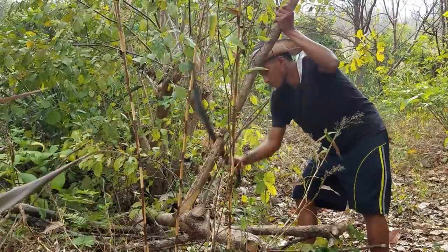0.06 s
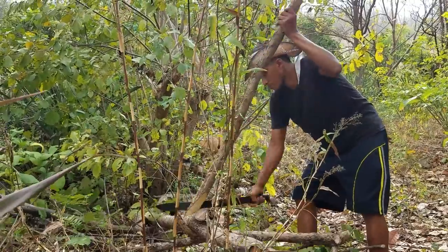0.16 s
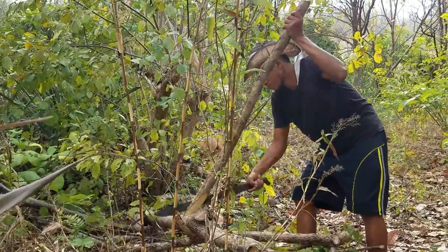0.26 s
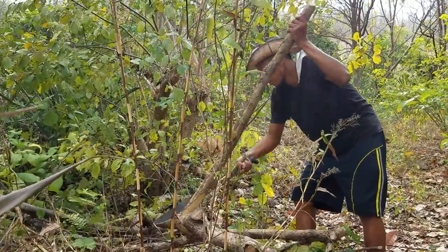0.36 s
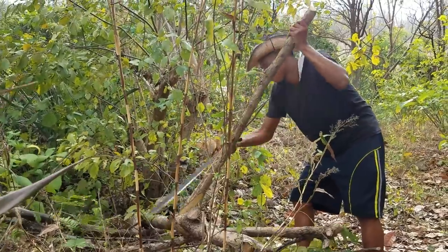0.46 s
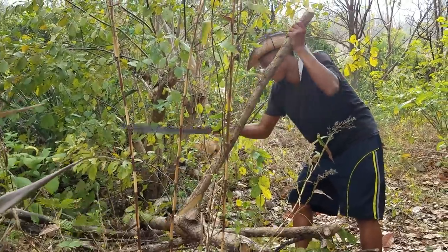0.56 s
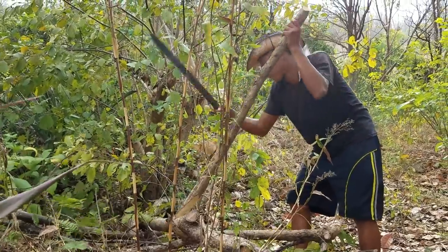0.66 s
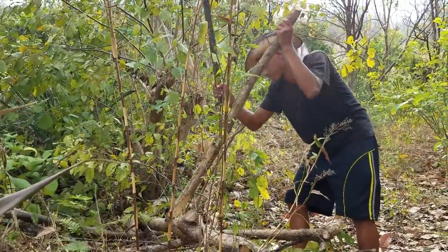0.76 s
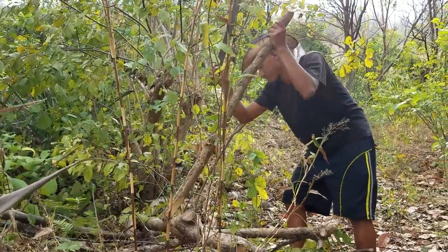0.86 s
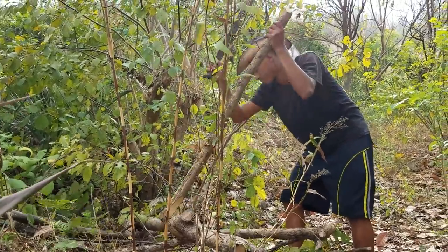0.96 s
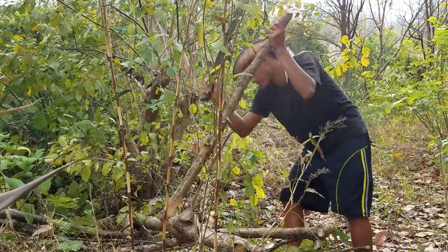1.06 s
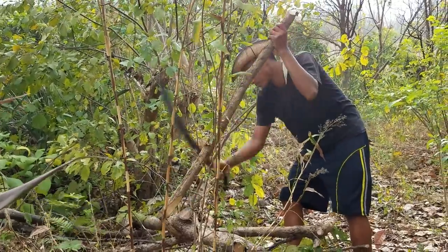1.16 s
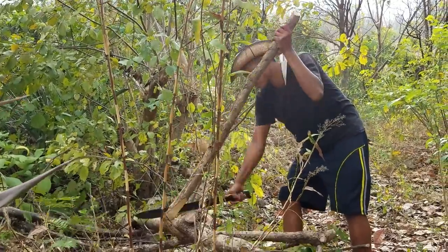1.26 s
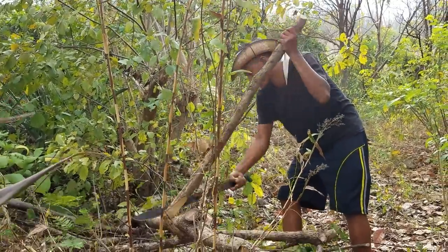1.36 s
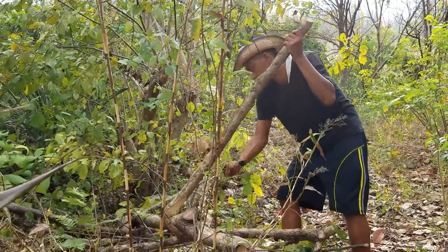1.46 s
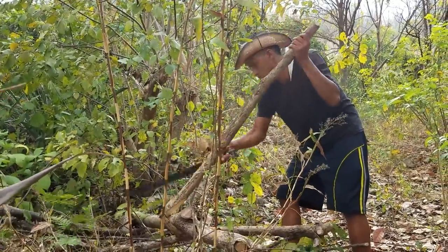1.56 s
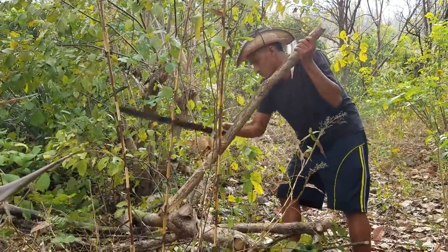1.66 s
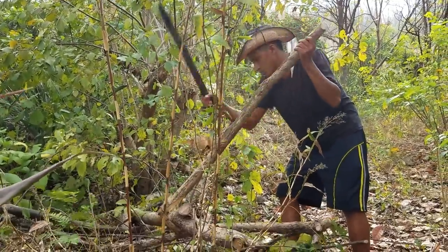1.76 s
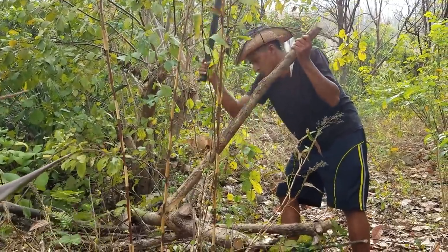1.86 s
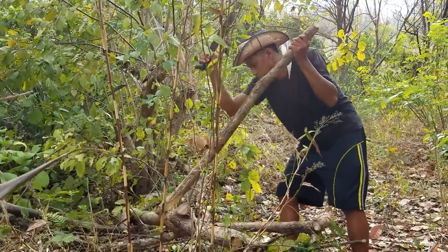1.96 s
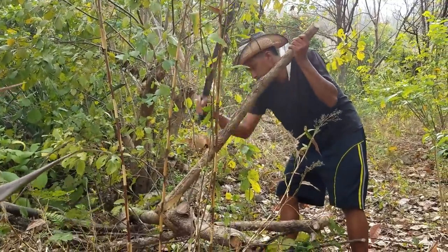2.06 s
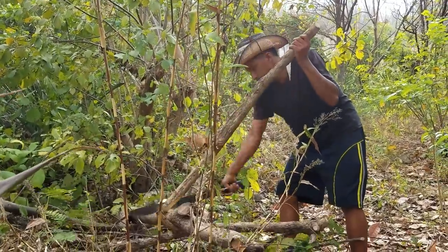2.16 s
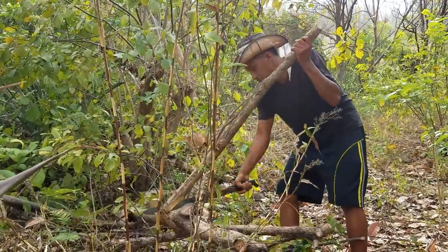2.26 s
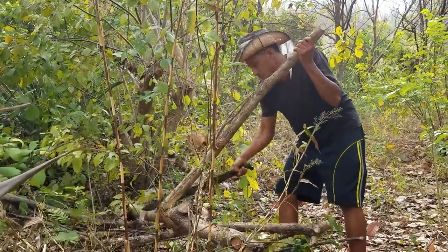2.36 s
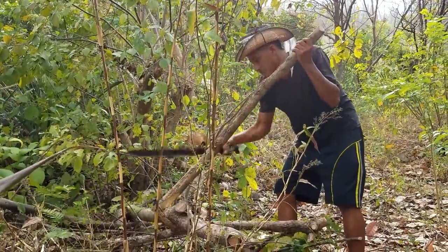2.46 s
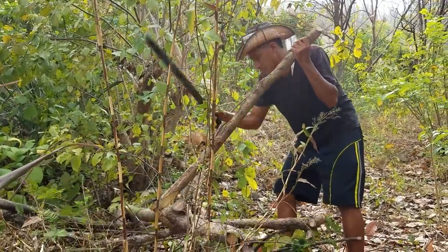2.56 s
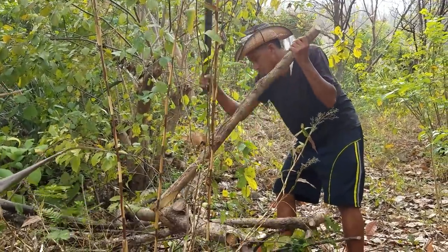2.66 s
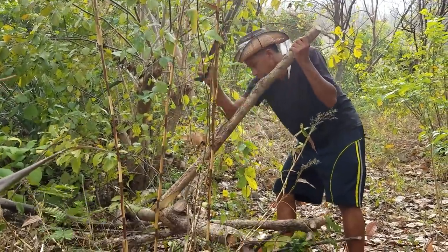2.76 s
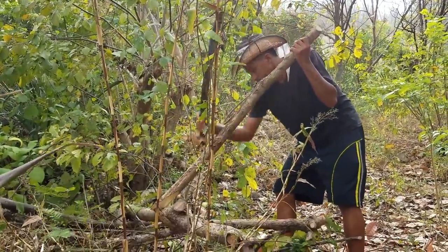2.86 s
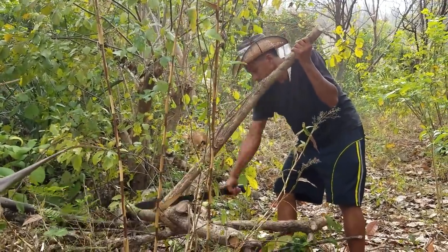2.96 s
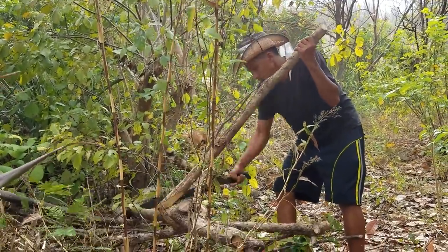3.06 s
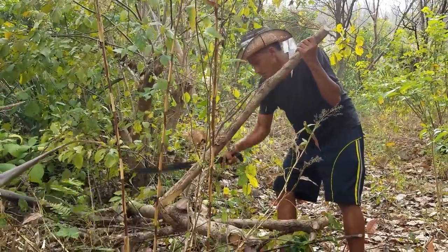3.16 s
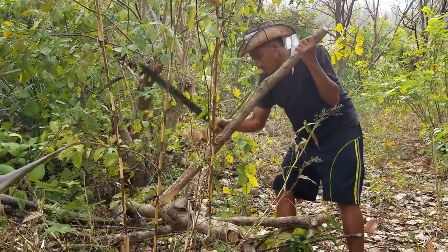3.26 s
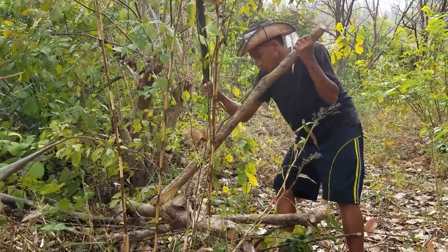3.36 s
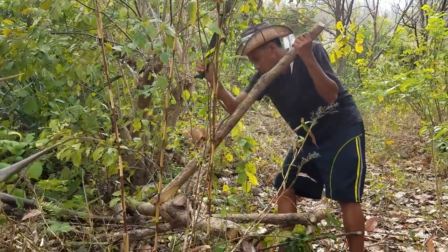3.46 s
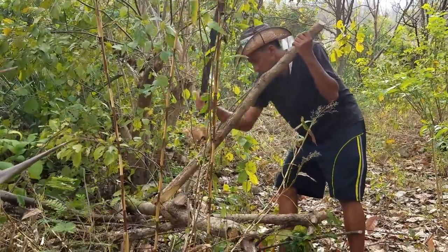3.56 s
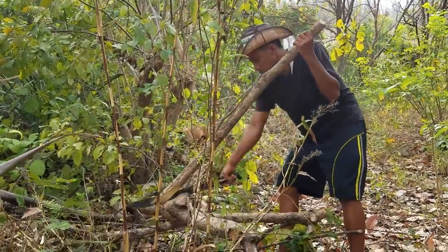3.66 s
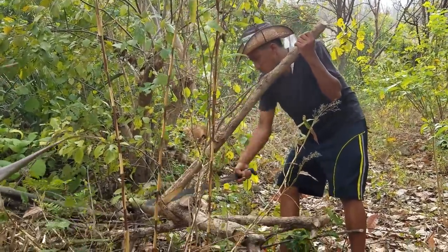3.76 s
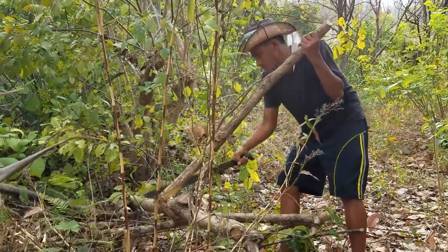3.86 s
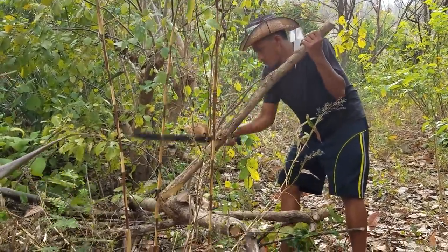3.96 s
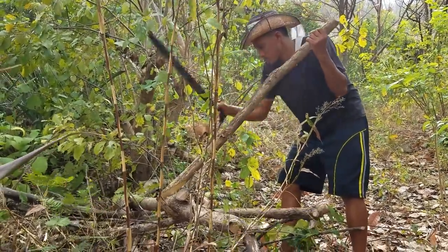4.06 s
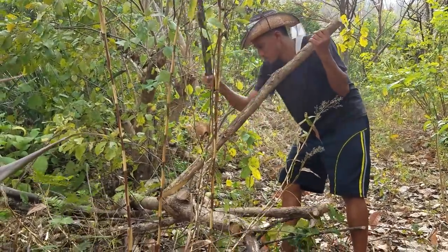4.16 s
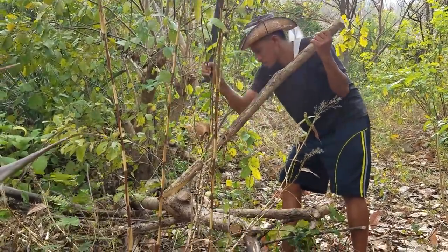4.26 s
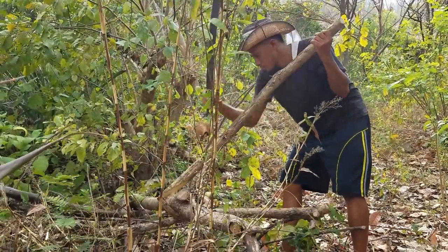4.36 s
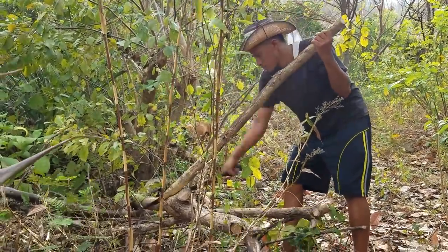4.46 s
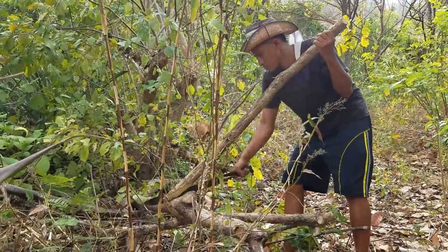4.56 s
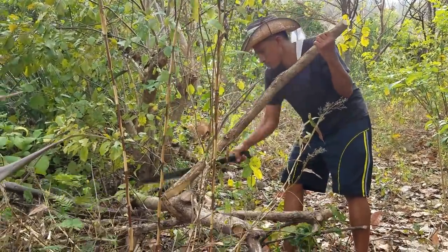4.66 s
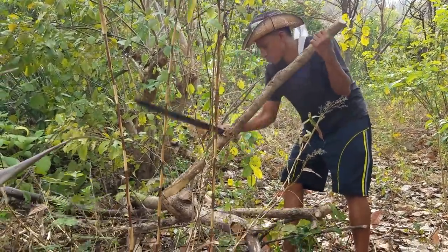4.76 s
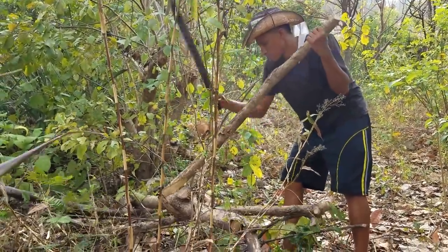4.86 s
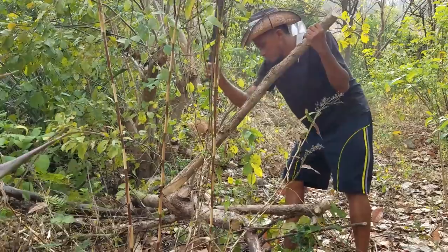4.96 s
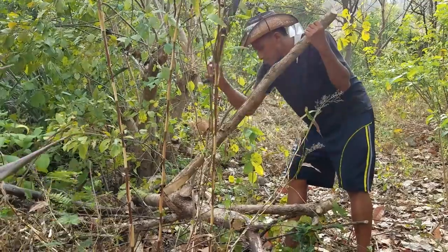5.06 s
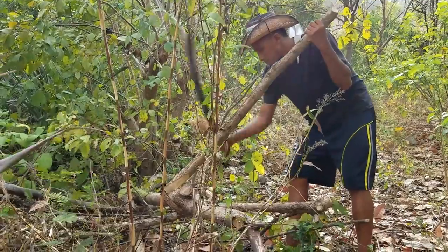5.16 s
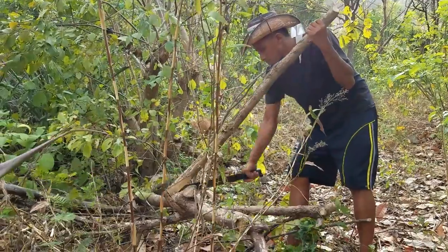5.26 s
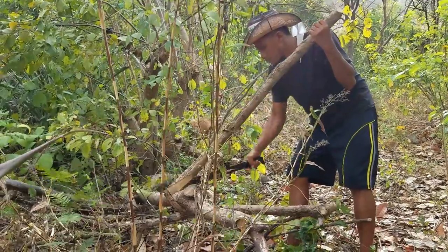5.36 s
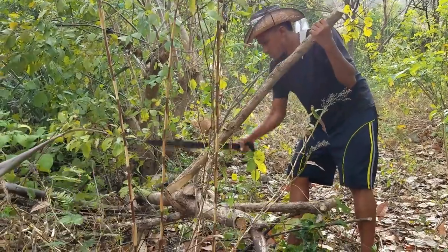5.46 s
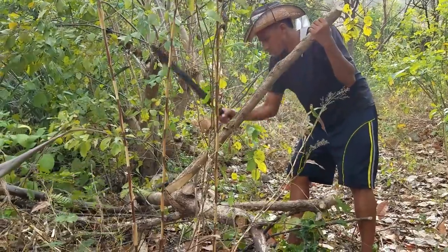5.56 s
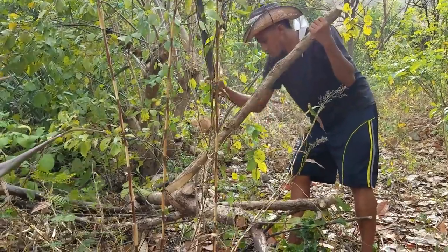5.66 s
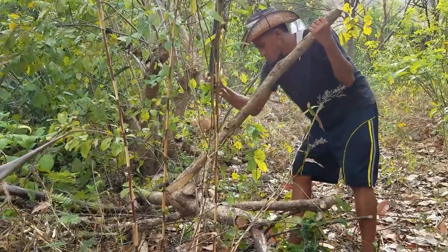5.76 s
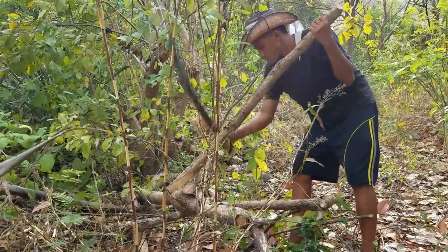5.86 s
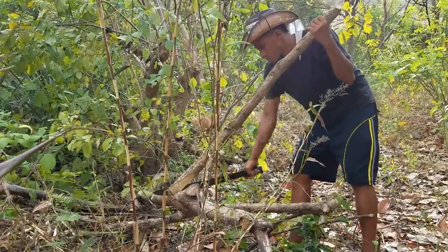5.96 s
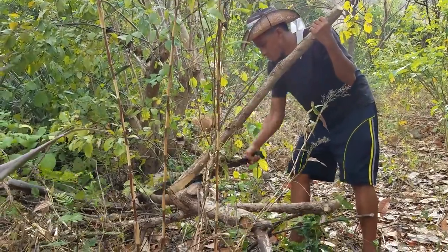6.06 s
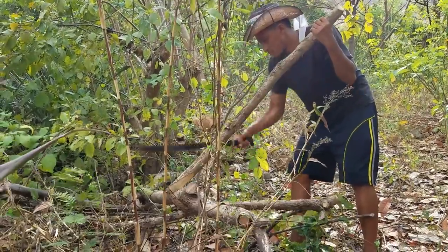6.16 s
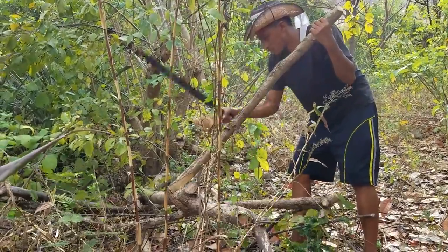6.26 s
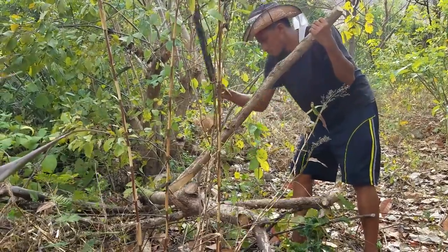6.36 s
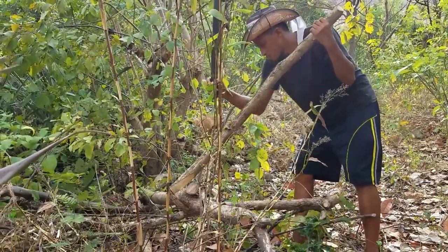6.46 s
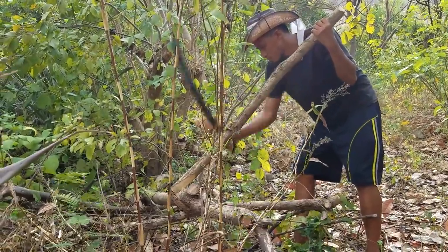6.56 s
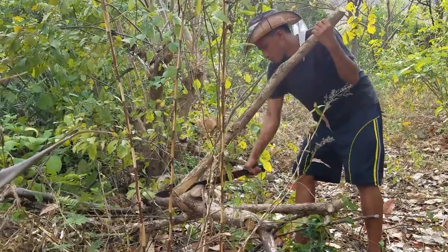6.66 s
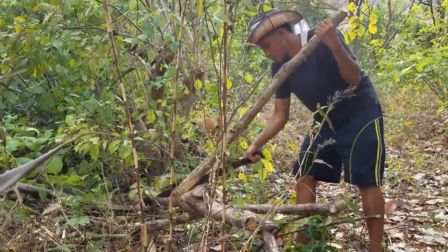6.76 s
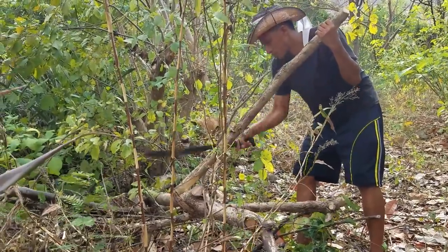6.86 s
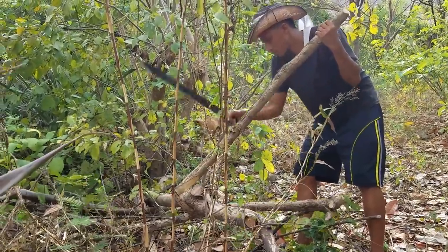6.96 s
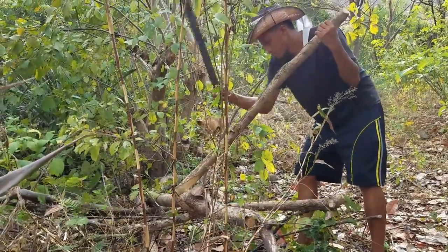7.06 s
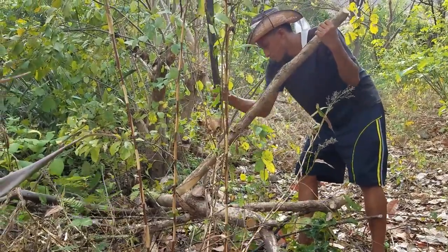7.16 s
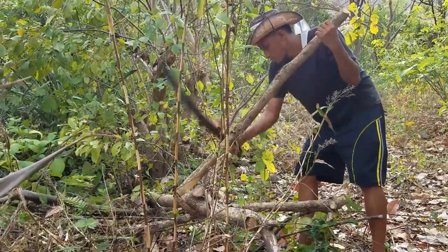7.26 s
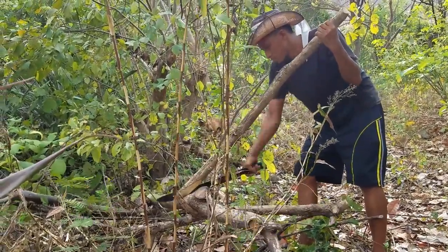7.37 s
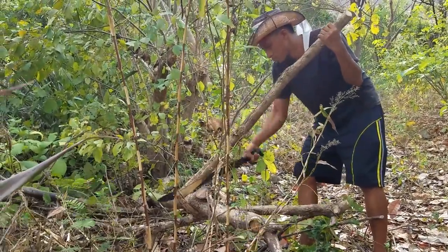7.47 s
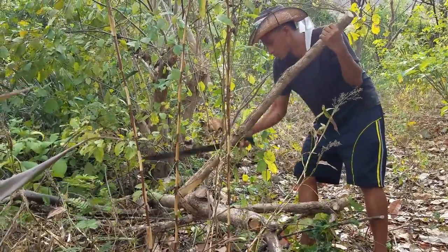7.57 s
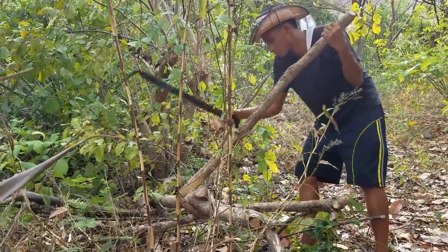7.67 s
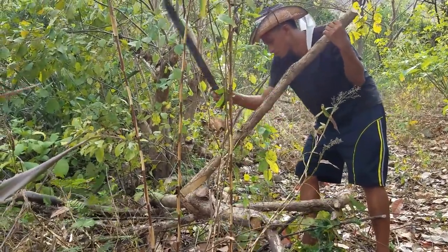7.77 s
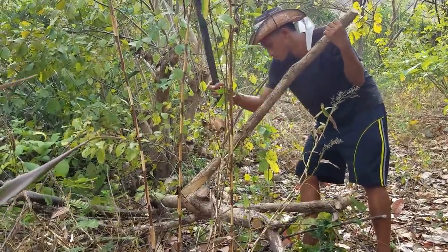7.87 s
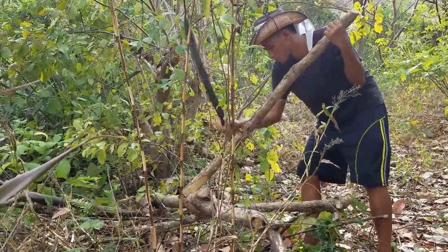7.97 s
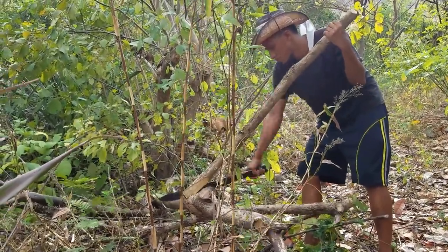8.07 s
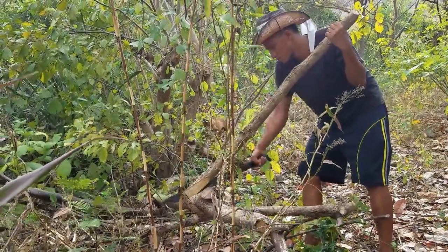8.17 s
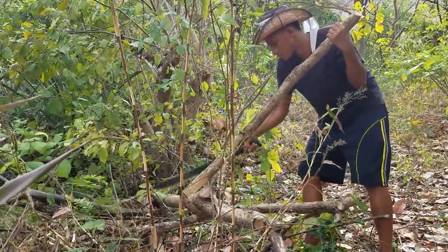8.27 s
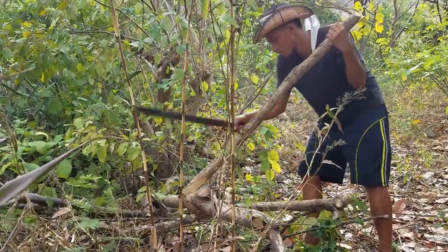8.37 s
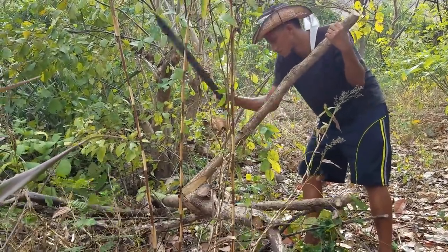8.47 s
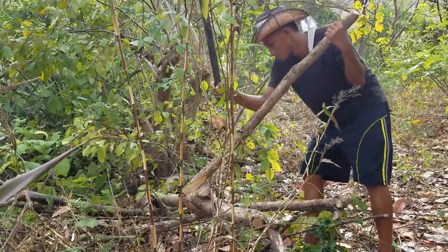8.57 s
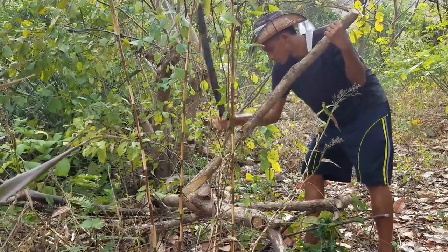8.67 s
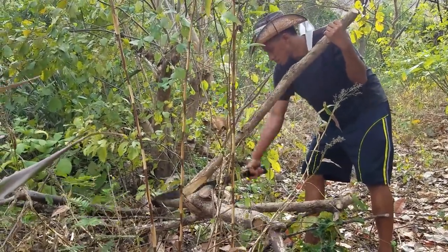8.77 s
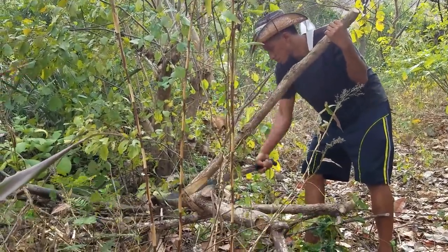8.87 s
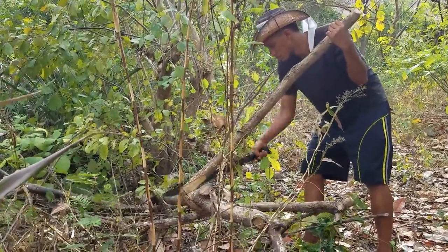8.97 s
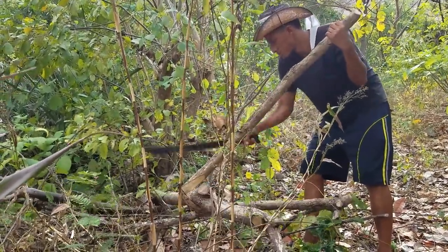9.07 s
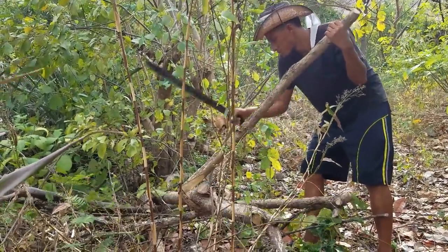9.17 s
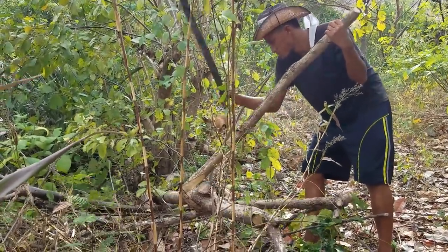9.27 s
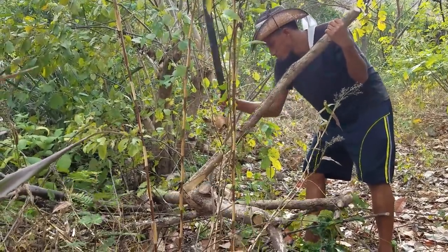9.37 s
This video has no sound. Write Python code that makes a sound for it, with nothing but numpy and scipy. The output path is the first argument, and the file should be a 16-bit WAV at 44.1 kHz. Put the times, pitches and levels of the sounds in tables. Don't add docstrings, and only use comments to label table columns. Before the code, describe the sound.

A blade chops a dry pole in scrub woodland, a few metres from a stereo microphone. Blows land at about 0.1, 1.2, 2.1, 2.9, 3.7, 4.5, 5.2, 5.9, 6.6, 7.3, 8.0 and 8.7 seconds: sharp cracks with torn fibres, a brief woody ring and a log knock beneath. The fifth knocks most resonantly; the eleventh is softer. Dry leaves shower and settle after each, with chips and twigs ticking, notably at 0.35, 1.3, 5.35 and 8.8. Steel rings faintly at 0.4 and 1.4, more clearly at 2.16 and 8.03. Low wind rumble and dull bumps fade after the opening seconds, leaving a faint breeze. A distant dove gives two-note coos about every two seconds. A thin whistle falls near 5.0; hoarse chirps and quick falling songbird phrases follow from 5.8, around 6.2, 7.5 and 8.9.

```python
import sys
import numpy as np
from scipy import signal
from scipy.io import wavfile
from scipy.ndimage import uniform_filter1d

SR = 44100
rng = np.random.default_rng(int(sys.argv[2]) if len(sys.argv) > 2 else 0)


def gain_from_db(level_db):
    decades = np.asarray(level_db, float) / 20
    return 10 ** decades


def dump_mix(stems):
    frames = np.atleast_2d(stems).T
    limited = np.clip(frames, -1, 1)
    pcm = np.round(limited * 32767).astype(np.int16)
    wavfile.write(sys.argv[1], SR, pcm)


N = 414981

EDGES_HZ = 35 * 2 ** np.arange(0, 9.1, .5)

# (time [s], level [dB])
RUMBLE = [(0.0, -71), (0.23, -62.5), (0.65, -70.5), (1.1, -74), (1.28, -66), (1.62, -74), (3.01, -67.5),
          (3.41, -99), (3.75, -82.5), (4.69, -88.5), (9.41, -88)]
# (time [s], peak [dB], frequency [Hz])
BUMPS = [
    (0.469, -48, 37.7),
    (0.899, -58, 45.8),
    (1.294, -36, 121),
    (3.942, -58, 160),
]

# (frequency [Hz], density [dB per Hz])
AIR = [(29, -28.5), (50, -7.5), (113, -25), (341, 4), (404, -5), (565, 3.5), (891, -6), (2170, -6.5),
       (6690, -22), (15500, -13)]
# (frequency [Hz], correlation [-1..1])
AIR_LIKENESS = [(60, 0.8), (240, 0.64), (950, 0.0049), (3770, -0.043), (15000, 0.017)]
AIR_DB = -65.5
# (frequency [Hz], level [dB])
LEAF_COLOUR = [(40, -33.5), (90, -17), (250, -5), (600, -5.5), (2000, -4), (4000, -5.5), (6500, -11),
               (10000, -4), (15000, -3.5)]
LEAF_HZ = [200, 1500, 8000]
# (rattle [dB], settling [dB/s], low stir above rattle [dB])
SHAKES = [(-54.5, 14, -9), (-49.5, 23.5, -9.5), (-53, 18, -6.5), (-50.5, 22.5, -9.5), (-51.5, 23, -11.5),
          (-53, 28.5, -19.5), (-54, 26.5, -10.5), (-53, 19.5, -17), (-56, 19, -14.5), (-56.5, 19.5, -16),
          (-56.5, 12, -12.5), (-53, 12, -14)]
BURST_DB, BURST_HOLD_S, BURST_FALL_DB_PER_S = 13.5, 0.035, 116.5
LOW_FALL, HISS_FALL, HISS_DB = 0.88, 1.06, -1
# (time [s], length [s], rattle [dB], hiss above rattle [dB])
STIRS = [(0.0, 0.056, -68.5, 3), (0.328, 0.054, -54, 6), (0.4, 0.068, -54.5, 4),
         (1.361, 0.0093, -43.5, 7.5), (1.382, 0.017, -53, -13), (1.546, 0.015, -49, -8),
         (1.67, 0.022, -52.5, -7), (1.53, 0.03, -51, 0.5), (1.656, 0.03, -54.5, 0), (2.462, 0.05, -55, 1),
         (2.607, 0.071, -59.5, 1.5), (2.743, 0.06, -64, 6.5), (3.967, 0.044, -56, -3),
         (4.112, 0.032, -56, -2), (4.925, 0.047, -60, -5), (5.023, 0.11, -66, -4), (5.733, 0.2, -67.5, 2),
         (7.636, 0.024, -54, -4), (8.401, 0.08, -85.5, 1), (9.094, 0.093, -61, -1),
         (9.323, 0.043, -67.5, 10)]
STIR_RISE_S, STIR_FALL_DB_PER_S, STIR_LOW_DB = 0.0046, 201.5, -9

# (time [s], level [dB])
DOVE = [
    (-0.14, -64.5),
    (2.05, -62),
    (4.24, -63.5),
    (6.34, -62),
    (8.55, -60.5),
]
# (delay [s], length [s], start [Hz], end [Hz], level [dB])
COO = [
    (0.0, .27, 764, 713, -0.44),
    (.49, 0.137, 756, 715, -0.037),
]
TREES_T60_S, FAR_ECHO_DB = .26, -14

# (time [s], thud [dB], knock [dB], crack [dB], splinter [dB])
BLOWS = [(0.093, -31.5, -26.5, -15, -26), (1.192, -29.5, -28.5, -16.5, -23.5),
         (2.146, -27, -23.5, -15.5, -24.5), (2.933, -31, -28.5, -18, -24.5), (3.6513, -36.5, -14, -13, -25),
         (4.457, -37, -24.5, -16.5, -21.5), (5.196, -37.5, -18.5, -20, -25.5),
         (5.898, -36.5, -21, -16, -24), (6.604, -38, -23, -17, -24.5), (7.298, -37, -24, -17, -22),
         (8.026, -42, -25.5, -25, -31.5), (8.737, -42.5, -24, -18.5, -28)]
LAYER_HZ = [150, 650, 2000, 9000]
STOP_S = [0.0022, 0.002, .0045, 0.0022, 0.003, 0.0045, 0.0125, 0.0088, 0.008, 0.003, .009, 0.0065]
ENTRY_DB = [-7, -0.5, 0, 8, -11, 1, -4, -14, 4, 3.5, -8.5, -10]
# (frequency [Hz], level [dB])
BLOW_COLOUR = [(50, -40.5), (120, -12.5), (300, -5.5), (700, -9.5), (1000, -14.5), (1400, -11.5),
               (3000, -11), (5500, -15.5), (9500, -7), (15000, -8.5)]
# (frequency [Hz], T60 [s])
BLOW_DECAY = [(80, 0.083), (260, 0.28), (700, 0.2), (1800, 0.082), (5000, 0.16), (13000, 0.093)]
# (frequency [Hz], level [dB])
SCATTER = [(100, -22.5), (700, -6), (3000, -5.5), (12000, -3.5)]
# (frequency [Hz], side over mid [dB])
BLOW_SIDE = [(60, -14), (110, -16), (200, -15), (380, -14), (700, -13), (1290, -7), (2380, -5), (4400, -1),
             (8120, 1), (15000, 0)]
# (frequency [Hz], left minus right [dB])
BALANCE_LR = [(100, -2.5), (700, -2), (2000, -1.8), (12000, 0)]
DEEP_HZ, DEEP_SHARE = 148.4, 0.74
EDGE_CLICK, STOP_CLICK, EDGE_CLICK_S = 3.1, 4.9, 0.0005
CLUMP_DB, CLUMP_FROM_S = 3, 0.034
LEAD_S = .0005

# (frequency [Hz], width [Hz])
POLE = [(345, 19), (570, 22), (685, 13), (765, 30), (838, 34), (1180, 48), (1275, 48), (1357, 49),
        (1635, 57), (1725, 45), (2170, 79), (2430, 74), (3200, 95)]
LOW_RINGS = [(-33.5, -31, -42.5, -29, -29), (-27, -43, -31, -36, -26.5), (-23, -28, -32, -32, -25.5),
             (-44, -26, -26.5, -23.5, -21.5), (-32.5, -20, -20, -12.5, -24),
             (-42.5, -42.5, -29, -37, -27.5), (-30, -25.5, -30, -21.5, -42), (-38, -32.5, -30, -26.5, -46),
             (-31, -29, -26, -36, -25.5), (-33, -25, -34.5, -32.5, -27), (-39, -42, -29.5, -29.5, -35),
             (-40, -37, -29, -38, -39)]
MIDDLE_RINGS = [(-32.5, -34.5, -24.5, -42), (-29, -54, -32, -41), (-37.5, -20.5, -21.5, -38),
                (-27.5, -34, -31.5, -34.5), (-16, -20.5, -20.5, -31), (-26, -21, -18, -22),
                (-23, -22.5, -21.5, -25), (-43, -28, -25, -31.5), (-17.5, -37, -54, -33),
                (-21, -44, -22.5, -20.5), (-27.5, -34, -27.5, -32), (-31, -26, -28, -38)]
HIGH_RINGS = [(-63.5, -31, -20, -18.5), (-57.5, -32, -21.5, -18), (-38, -29, -24, -21.5),
              (-45, -28.5, -35, -19.5), (-25, -31, -29, -38), (-20.5, -22, -26, -34),
              (-33.5, -27.5, -36.5, -29), (-48, -44, -34, -35), (-45, -18, -36, -18.5),
              (-25, -18, -42, -20), (-26, -50, -57, -34), (-26, -34, -43, -27)]
# (frequency [Hz], width [Hz])
POLE_EXTRA = [(520, 22), (1490, 45), (2670, 72), (3340, 67)]
EXTRA_RINGS = [(-34, -33.5, -34, -19), (-41, -26.5, -28.5, -24.5), (-40.5, -39.5, -37.5, -33.5),
               (-39, -31, -28, -34), (-22.5, -24, -31.5, -36.5), (-39, -31.5, -25, -27.5),
               (-36, -34, -32, -36), (-40, -31, -35, -40), (-33, -47, -32, -35), (-45, -34, -35, -29),
               (-41, -48, -46, -39), (-39, -43, -41, -36)]
# (frequency [Hz], width [Hz])
TIP_MODE = (3780, 110)
TIP_RINGS = [-30, -36, -30, -34, -38, -23, -36, -38, -30, -30, -38, -38]
# (delay after stop [s], share of jolt [1])
REBOUNDS = [(.016, 0.18), (.014, 0.21), (0.013, 0.82), (0.021, 0.29), (.0078, 0.55), (0.011, 0.29),
            (0.012, 0.61), (0.02, 0.77), (0.0078, 0.51), (.0095, 1.5), (0.014, 0.63), (.012, 0.58)]
RING_DB, JOLT, BITE_S = 3.5, 28, 0.007
CONTACT_HZ = 1800
# (frequency [Hz], level [dB], T60 [s])
LOG = [(117, -9, 0.27), (222.5, -4, 0.18), (354, -6, 0.14), (1700, -8.5, .08)]

# (time [s], peak [dB], frequency [Hz], bright edge [dB])
CHIPS = [(0.316, -39, 3850, -57), (0.347, -21, 2910, -61), (0.37, -32, 3800, -42), (0.414, -31, 790, -41.5),
         (0.471, -33, 2460, -52), (1.278, -22, 1160, -31), (1.371, -29, 3850, -37), (1.555, -42, 1010, -53),
         (1.76, -38, 1090, -48.5), (1.901, -39.5, 1250, -70), (1.977, -37.5, 1110, -68),
         (2.011, -45, 1400, -64), (2.466, -46, 810, -54), (3.341, -41, 2360, -52),
         (3.826, -48, 1600, -38.5), (3.909, -42, 1280, -50), (4.093, -67.5, 2100, -54),
         (4.749, -48, 800, -67), (5.346, -22.5, 1170, -69.5), (6.244, -42, 2020, -54),
         (6.819, -40, 2000, -50), (7.022, -62, 1450, -50.5), (7.088, -35, 1700, -67),
         (7.512, -36, 2270, -69), (7.643, -54, 2950, -49.5), (8.205, -39, 2310, -46),
         (8.826, -25, 780, -48), (9.093, -35.5, 1450, -42), (9.142, -31, 3800, -46),
         (9.349, -41.5, 3320, -53)]
# (time [s], peak [dB], frequency [Hz])
CRUMBS = [(0.576, -46, 2000), (0.804, -49, 1630), (1.022, -62, 1070), (1.095, -48.5, 2650),
          (1.738, -54, 800), (2.389, -42, 4700), (2.505, -43, 1490), (2.556, -46, 2200), (2.775, -48, 883),
          (3.175, -39.5, 4800), (3.94, -60, 1860), (4.984, -50, 1520), (5.052, -55, 3100),
          (5.346, -46, 580), (5.468, -46.5, 890), (5.858, -53, 4000), (6.11, -49, 1120), (6.371, -48, 800),
          (7.419, -45, 2430), (8.148, -39.5, 2440), (8.306, -43, 1550)]
CRUMB_EDGE_DB, FIRST_CLICK = -5.5, 3.5
CHIP_T60_S, CHIP_RISE_S, CHIP_WIDTH_SHARE = 0.041, .0005, 0.17

# (frequency [Hz], level [dB], T60 [s])
BLADE = [(4555, 7.5, 0.15), (5180, 8, 0.25), (5660, 7, 0.42), (6100, 8, .23), (6374, 5, 0.17),
         (6965, 11, .13), (9200, 13, 0.24), (13800, 16, .15)]
# (time [s], level [dB], favoured mode [Hz])
BLADE_TOUCH = [
    (0.422, -53, 5130),
    (1.405, -59, 5200),
    (2.159, -42, 4560),
    (8.031, -51, 5700),
    (8.037, -43, 4500),
]

# (time [s], peak [dB], frequency [Hz])
SNAPS = [(1.585, -36, 5960), (1.622, -48, 6000), (2.467, -34, 9300), (3.177, -52, 6000), (2.664, -59, 7000),
         (3.908, -39, 4000), (4.215, -52.5, 3500), (4.236, -53, 5500), (4.373, -53, 7100),
         (4.958, -56, 6000), (5.052, -47.5, 9200), (5.116, -54, 5940), (6.186, -44, 1980),
         (6.82, -45, 2300), (6.885, -40, 1500), (7.024, -45, 2620), (9.142, -52, 5000), (4.531, -31, 1800),
         (4.581, -35, 1500), (7.713, -53, 6970), (8.255, -41, 8000), (8.45, -59, 8000), (8.485, -43, 7050),
         (8.59, -49, 6000), (8.711, -56, 7000)]
# (time [s], peak [dB], frequency [Hz])
TICKS = [(0.824, -46, 10000), (0.925, -50, 10000), (0.999, -49, 1500), (1.024, -48, 10000),
         (1.271, -24, 10000), (1.376, -22, 3220), (1.658, -43, 4000), (1.716, -47, 10000),
         (1.739, -47, 1400), (2.002, -48, 1400), (2.53, -46, 3980), (3.099, -44, 4000), (3.19, -47, 10000),
         (4.654, -42, 1800), (4.75, -49, 10100), (4.857, -46, 1500), (4.863, -54, 10000),
         (4.948, -45, 1500), (5.028, -46, 1500), (5.399, -41, 1500), (5.415, -47, 4000), (5.435, -41, 1500),
         (5.446, -45, 10000), (5.552, -47, 3200), (5.708, -53, 3000), (5.721, -56, 9000),
         (5.748, -47.5, 13000), (5.792, -51, 6000), (5.856, -44, 11000), (6.021, -34, 1500),
         (6.113, -42, 4000), (6.372, -53, 3800), (6.425, -58, 10000), (6.461, -56, 10000),
         (6.479, -50, 10000), (6.961, -41, 1500), (7.539, -43, 1500), (9.143, -34, 1400)]
SNAP_T60_S, SNAP_WIDTH_SHARE, SNAP_CLICK = 0.026, 0.59, 3.7

# (time [s], length [s], start [Hz], end [Hz], level [dB])
WHISTLE = [
    (4.947, .075, 4600, 3330, -66),
    (5.015, .19, 3380, 2700, -71),
]
# (time [s], length [s], frequency [Hz], width
# [Hz], level [dB])
SWEEP_ECHOES = [
    (5.786, 0.083, 2080, 900, -56),
    (7.144, 0.12, 2110, 770, -57),
    (7.762, 0.064, 2060, 1200, -55),
    (8.55, 0.24, 2240, 980, -54),
]
PHRASES = [
    6.158,
    7.545,
    8.922,
]
# (delay [s], length [s], start [Hz], end [Hz])
SONG = [(0.0, .016, 2500, 2880), (0.008, .065, 2870, 2810), (.083, .045, 3350, 2280),
        (.118, .04, 2330, 2280), (.215, .04, 2500, 2480), (.238, .025, 2930, 2860),
        (.325, .045, 2200, 1850), (.38, .065, 1750, 1400), (.672, .058, 3450, 2280),
        (.715, .03, 2270, 2230), (1.028, .13, 2570, 1480)]
SONG_DB = [(-75, -61, -58), (-80, -57, -53), (-65, -55, -57), (-70, -66, -58), (-74, -68, -57),
           (-62, -73, -58), (-65, -80, -61), (-70, -80, -63), (-57, -80, -60), (-59, -80, -60),
           (-54, -54, -60)]
# (time [s], length [s], start [Hz], end [Hz],
# level [dB])
SINGLE_NOTES = [
    (6.16, .045, 2740, 2700, -55),
    (7.675, .03, 1420, 1540, -58),
    (7.89, .045, 2080, 1880, -67),
    (7.938, .06, 1800, 1400, -65),
    (8.232, .045, 3200, 2500, -55),
    (8.268, .03, 2300, 2200, -59),
    (9.19, .11, 4480, 4250, -69),
    (9.105, .025, 2300, 2320, -60),
]
SONG_LEAN = .45


def at_hz(points, hz):
    table_hz, value = np.array(points).T
    return np.interp(np.log(hz), np.log(table_hz), value)


def add(out, sound, s):
    i = round(s * SR)
    sound = sound[..., max(-i, 0):N - i]
    start = max(i, 0)
    out[..., start:start + sound.shape[-1]] += sound


def band(x, low_hz, high_hz):
    sos = signal.butter(2, [low_hz, high_hz], "band", fs=SR, output="sos")
    return signal.sosfilt(sos, x) * np.sqrt(SR / 2 / (high_hz - low_hz))


def ring(x, hz, width_hz):
    r = np.exp(-np.pi * width_hz / SR)
    poles = [1, -2 * r * np.cos(2 * np.pi * hz / SR), r * r]
    return signal.lfilter([1, 0, -1], poles, x) * np.sqrt((1 - r * r) / 2)


def grains(shape, spread_db):
    x = rng.standard_normal(shape)
    x = x * gain_from_db(spread_db * np.minimum(rng.exponential(1, shape), 6))
    return x / np.std(x)


def drift(rate_hz):
    knots = rng.standard_normal(400)
    return np.interp(np.arange(N) / SR * rate_hz, np.arange(400), knots)


def spread(mid_side, hz, side_db):
    lean_db = at_hz(BALANCE_LR, hz) / 2
    mid, side = mid_side[..., :1, :], mid_side[..., 1:, :]
    return (mid + gain_from_db(side_db) * side * [[1], [-1]]) * gain_from_db([[lean_db], [-lean_db]])


def ground():
    s, level_db = np.transpose(RUMBLE)
    wind_db = np.interp(np.arange(N) / SR, s, level_db) + 2.0 + 2.5 * drift(9.1)
    out = gain_from_db(wind_db) * band(rng.standard_normal(N), 25, 90)
    t = np.arange(SR // 4) / SR
    for s, peak_db, hz in BUMPS:
        envelope = gain_from_db(peak_db + 1.5 - 60 * t / 0.093) * np.minimum(t / 0.0078, 1)
        add(out, envelope * np.sin(2 * np.pi * hz * t), s)
    return out * gain_from_db([[-1.1], [1.1]])


def litter_db(t):
    power = np.full((3, len(t)), 1e-12)
    for (s, *_), (rattle_db, settling, low_db) in zip(BLOWS, SHAKES):
        age = np.maximum(t - s, 0)
        shower = gain_from_db(BURST_DB - BURST_FALL_DB_PER_S * np.maximum(age, BURST_HOLD_S))
        slow = gain_from_db(-settling * age * np.c_[[LOW_FALL, 1, HISS_FALL]])
        layers = gain_from_db(rattle_db + np.c_[[low_db, 0, HISS_DB]])
        power += (t > s) * (layers * (shower + slow)) ** 2
    for s, length, rattle_db, hiss_db in STIRS:
        rise = np.clip((t - s) / STIR_RISE_S, 0, 1)
        fall = gain_from_db(-STIR_FALL_DB_PER_S * np.maximum(t - s - length, 0))
        layers = gain_from_db(rattle_db + np.c_[[STIR_LOW_DB, 0, hiss_db]])
        power += (layers * rise * fall) ** 2
    return 10 * np.log10(power)


def leaves_and_air():
    ticks = (rng.random(N) < 45.0 / SR) * np.minimum(rng.exponential(.6, N), .7)
    ticks = signal.lfilter([.9], [1, -np.exp(-1 / (0.0036 * SR))], ticks)
    crackle = grains((2, 2, N), spread_db=2.0) * gain_from_db(1.6 * drift(35) - 4.0) * (1 + ticks)
    white = rng.standard_normal((2, 2, N))
    bands = list(zip(EDGES_HZ, EDGES_HZ[1:]))
    air_power = sum(gain_from_db(2 * at_hz(AIR, np.sqrt(a * b))) * (b - a) for a, b in bands)
    air_level = gain_from_db(AIR_DB) / np.sqrt(air_power)
    coarse_s = np.arange(0, N, 16) / SR
    layers_db = litter_db(coarse_s)
    out = 0
    for k, (low, high) in enumerate(bands):
        hz = np.sqrt(low * high)
        weights = [np.interp(np.log(hz), np.log(LEAF_HZ), pick) for pick in np.eye(len(LEAF_HZ))]
        curve_db = sum(weight * row for weight, row in zip(weights, layers_db))
        flicker_db = 1.6 * np.interp(coarse_s * 14, np.arange(400), rng.standard_normal(400))
        leaf = gain_from_db(curve_db + at_hz(LEAF_COLOUR, hz) + flicker_db).repeat(16)[:N]
        leaf = leaf * gain_from_db([[0], [at_hz(BLOW_SIDE, hz) + 1.4]])
        alike = np.clip(at_hz(AIR_LIKENESS, hz), -.9, .95)
        mid_side_power = (1 + alike * np.array([[1], [-1]])) / 2
        air = air_level * gain_from_db(at_hz(AIR, hz)) * np.sqrt((high - low) * mid_side_power)
        out = out + spread(band(leaf * crackle[k % 2] + air * white[k % 2], low, high), hz, 0)
    return out


def bird(notes, overtones_db, bend, arch_hz, lean, swell, flutter_db, pan_db, echo_db):
    voice = np.zeros(N)
    for s, length, start_hz, end_hz, level_db in notes:
        u = np.arange(round(length * SR)) / (length * SR)
        arch = np.sin(np.pi * u ** lean)
        glide = np.expm1(-bend * u) / np.expm1(-bend)
        pitch_hz = start_hz + (end_hz - start_hz) * glide + arch_hz * arch
        phase = 2 * np.pi * np.cumsum(pitch_hz) / SR
        tone = sum(gain_from_db(db) * np.sin((k + 1) * phase) for k, db in enumerate(overtones_db))
        add(voice, gain_from_db(level_db) * tone * arch ** swell, s)
    voice = voice * gain_from_db(flutter_db * drift(40))
    t = np.arange(SR // 4) / SR
    echoes = rng.standard_normal((2, len(t))) * gain_from_db(echo_db - 60 * t / TREES_T60_S - 21)
    return (voice + signal.fftconvolve(voice[None], echoes)[:, :N]) * gain_from_db([[pan_db], [-pan_db]])


def dove():
    coos = [(s + after, *note, db + note_db) for s, db in DOVE for after, *note, note_db in COO]
    return bird(coos, [.5], bend=.6, arch_hz=55, lean=.7, swell=0.29,
                flutter_db=.8, pan_db=-4.5, echo_db=FAR_ECHO_DB)


def swishes():
    out, u = np.zeros((2, N)), np.arange(round(0.045 * SR)) / (0.047 * SR)
    for s, *_ in BLOWS:
        puff = rng.standard_normal((2, len(u))) * u ** 2.4
        add(out, gain_from_db(-54.0) * spread(band(puff, 1300, 2800), 2000, -2.0), s - len(u) / SR)
    return out


def tearing_fibres(t):
    count = len(BLOWS)
    lumps = gain_from_db(2.2 * rng.standard_normal((count, 1, len(t) // 128 + 1)))
    lumps = lumps.repeat(128, axis=2)[..., :len(t)]
    fibres = grains((2, count, 2, len(t)), spread_db=2.5) * uniform_filter1d(lumps, size=100)
    knots = rng.standard_normal((count, 40))
    clumps = np.array([np.interp(t * 90, np.arange(40), row) for row in knots])
    fibres = fibres * gain_from_db(CLUMP_DB * clumps * np.clip(t / CLUMP_FROM_S - .5, 0, 1))[:, None]
    fibres[:, :, 0, round(EDGE_CLICK_S * SR)] = EDGE_CLICK
    fibres[:, np.arange(count), 0, (np.array(STOP_S) * SR).astype(int)] = STOP_CLICK
    before_stop = np.clip(7.5 * (1 - t / np.c_[STOP_S]), 0, 1)
    return fibres * gain_from_db(np.c_[ENTRY_DB] * before_stop)[:, None]


def cuts_in_bands(fibres, t):
    levels = np.array(BLOWS)[:, 1:]
    stop_s = np.c_[STOP_S]
    thud_over_knock_db = levels[:, 0] - levels[:, 1] + 10.5
    cuts = 0
    for k, (low, high) in enumerate(zip(EDGES_HZ, EDGES_HZ[1:])):
        hz = np.sqrt(low * high)
        late = np.maximum(t - np.clip(520 / hz - .3, 0, 1) * stop_s, 0)
        crack = gain_from_db(-6.5 - 60 * late / 0.0076)
        fall = gain_from_db(-60 * np.maximum(t - stop_s - .006, 0) / at_hz(BLOW_DECAY, hz))
        scatter = gain_from_db(at_hz(SCATTER, hz) - 60 * t / 0.33)
        shape = (1 - np.exp(-late / 0.0005)) * (crack + fall + scatter)
        level_db = np.array([np.interp(np.log(hz), np.log(LAYER_HZ), row) for row in levels])
        level_db += at_hz(BLOW_COLOUR, hz) - 3.0
        level_db += DEEP_SHARE * max(np.log2(DEEP_HZ / hz), 0) * thud_over_knock_db
        torn = fibres[k % 2] * (gain_from_db(level_db)[:, None] * shape)[:, None]
        cuts = cuts + spread(band(torn, low, high), hz, at_hz(BLOW_SIDE, hz))
    return cuts


def pole_ring(fibres, k, t):
    late = np.maximum(t - STOP_S[k], 0)
    drive = fibres * (late > 0) * gain_from_db(-60 * np.maximum(late - BITE_S, 0) / 0.072)
    rebound_s, rebound_share = REBOUNDS[k]
    drive[0, round(STOP_S[k] * SR)] = JOLT
    drive[0, round((STOP_S[k] + rebound_s) * SR)] = JOLT * rebound_share
    drive = signal.lfilter(*signal.butter(2, CONTACT_HZ, fs=SR), drive)
    modes = [*POLE, *POLE_EXTRA, TIP_MODE]
    rings_db = [*LOW_RINGS[k], *MIDDLE_RINGS[k], *HIGH_RINGS[k], *EXTRA_RINGS[k], TIP_RINGS[k]]
    out = 0
    for (hz, width_hz), level_db in zip(modes, rings_db):
        tone = ring(drive, hz, width_hz)
        tone = -tone / np.abs(tone).max(axis=1, keepdims=True)
        out = out + spread(tone, hz, at_hz(BLOW_SIDE, hz) - 1.5) * gain_from_db(level_db + RING_DB)
    return out


def log_knock(thud_db, late):
    knock = 0
    for hz, level_db, t60 in LOG:
        start_db = thud_db + level_db - 1.0 + 3.3 * rng.normal()
        knock = knock + gain_from_db(start_db - 60 * late / t60) * np.sin(2 * np.pi * hz * late)
    return knock * gain_from_db([[-.9], [.9]])


def blows():
    t = np.arange(round(SR / 3)) / SR
    fibres = tearing_fibres(t)
    cuts = cuts_in_bands(fibres, t)
    out = np.zeros((2, N))
    for k, (s, thud_db, *_) in enumerate(BLOWS):
        knock = log_knock(thud_db, np.maximum(t - STOP_S[k], 0))
        add(out, cuts[k] + pole_ring(fibres[0, k], k, t) + knock, s - LEAD_S)
    return out


def chips():
    out, t = np.zeros((2, N)), np.arange(round(SR / 8)) / SR
    pieces = [*CHIPS, *[(s, db, hz, db + CRUMB_EDGE_DB) for s, db, hz in CRUMBS]]
    scratch = grains((len(pieces), 2, len(t)), spread_db=4.0)
    for clicks, (s, peak_db, hz, edge_db) in zip(scratch, pieces):
        drive = clicks * gain_from_db(-60 * t / CHIP_T60_S) * np.minimum(t / CHIP_RISE_S, 1)
        drive[:, round(CHIP_RISE_S * SR)] = FIRST_CLICK
        drive = drive * 6.3 / np.sqrt(np.sum(drive ** 2, axis=1, keepdims=True))
        wood = gain_from_db(peak_db - 6.5) * ring(drive, hz, CHIP_WIDTH_SHARE * hz)
        wood = wood + gain_from_db(edge_db + 5.0) * band(drive, 550, 4800)
        edge = gain_from_db(edge_db + 3.0) * band(drive, 3300, 16700)
        add(out, spread(wood, hz, -6.5) + spread(edge, hz, .3), s - LEAD_S)
    return out


def blade():
    out, t = np.zeros(N), np.arange(SR // 2) / SR
    for s, touch_db, favoured_hz in BLADE_TOUCH:
        for hz, level_db, t60 in BLADE:
            start_db = touch_db + level_db - 60 * min(abs(np.log2(hz / favoured_hz)), .27)
            envelope = gain_from_db(start_db - 60 * t / t60) * np.minimum(t / 0.0019, 1)
            add(out, envelope * np.sin(2 * np.pi * hz * t), s)
    return out * gain_from_db([[2.5], [-2.5]])


def snaps():
    out, t = np.zeros((2, N)), np.arange(SR // 40) / SR
    events = [*SNAPS, *TICKS]
    crackle = grains((len(events), 2, len(t)), spread_db=-3.0)
    crackle[..., round(CHIP_RISE_S * SR)] = SNAP_CLICK
    for clicks, (s, peak_db, hz) in zip(crackle, events):
        snap = ring(clicks * gain_from_db(-60 * t / SNAP_T60_S), hz, SNAP_WIDTH_SHARE * hz)
        add(out, gain_from_db(peak_db - 8.5) * spread(snap, hz, -1.5), s - LEAD_S)
    return out


def whistle():
    return bird(WHISTLE, [1.5, -5, -6], bend=1.6, arch_hz=0, lean=SONG_LEAN, swell=0.43,
                flutter_db=5, pan_db=3.0, echo_db=FAR_ECHO_DB)


def sweep_echoes():
    out = np.zeros((2, N))
    for s, length, hz, width_hz, level_db in SWEEP_ECHOES:
        u = np.arange(round(length * SR)) / (length * SR)
        rough = rng.standard_normal((2, len(u))) * np.sin(np.pi * u) ** .5
        add(out, gain_from_db(level_db) * band(rough, hz - width_hz / 2, hz + width_hz / 2), s)
    return out


def songbird():
    song = []
    for k, s in enumerate(PHRASES):
        for (after, length, start_hz, end_hz), levels_db in zip(SONG, SONG_DB):
            if s + after < N / SR:
                song.append((s + after, length, start_hz, end_hz, levels_db[k]))
    return bird([*song, *SINGLE_NOTES], [.6], bend=1.3, arch_hz=0, lean=SONG_LEAN, swell=0.78,
                flutter_db=3.2, pan_db=1.5, echo_db=-5)


def scene():
    background = ground() + leaves_and_air()
    chopping = swishes() + blows() + chips() + blade() + snaps()
    birds = dove() + whistle() + sweep_echoes() + songbird()
    return background + chopping + birds


def top_cut(x):
    return signal.sosfilt(signal.butter(12, 16870, fs=SR, output="sos"), x)


def record(dry):
    x = signal.sosfilt(signal.butter(2, 55, "high", fs=SR, output="sos"), dry)
    x = .95 * np.tanh(x / .95) - .0005
    x = signal.sosfilt(signal.cheby2(10, 22, 15900, fs=SR, output="sos"), x)
    x = signal.sosfilt(signal.cheby2(14, 60, 17150, fs=SR, output="sos"), x)
    return top_cut(x)


dry = scene()
out = record(dry)
dump_mix(out)
```